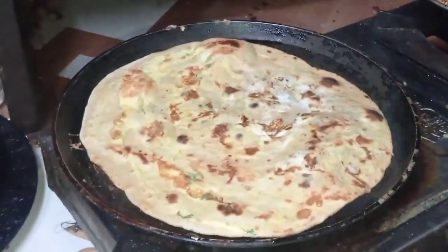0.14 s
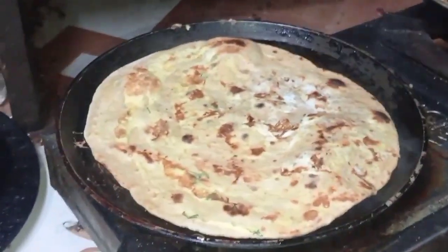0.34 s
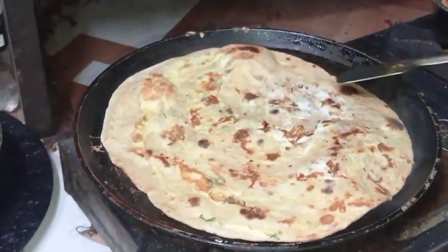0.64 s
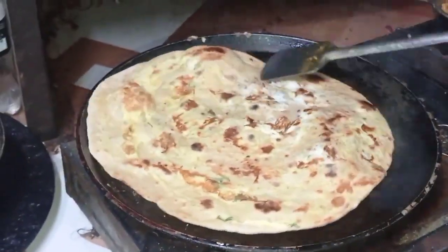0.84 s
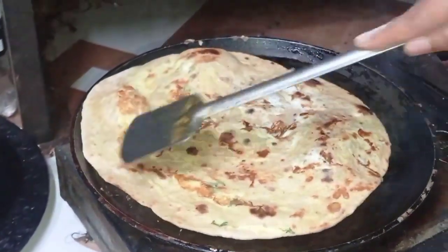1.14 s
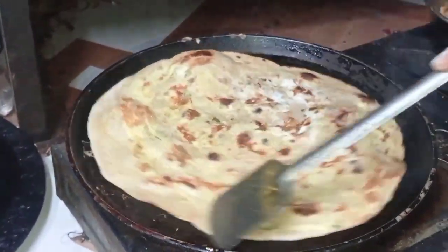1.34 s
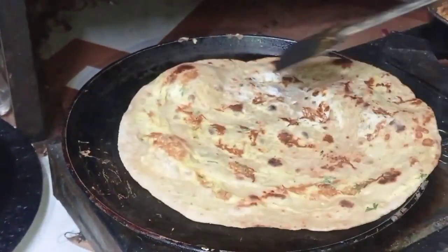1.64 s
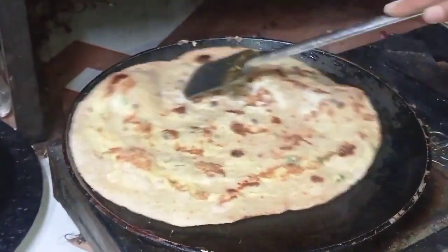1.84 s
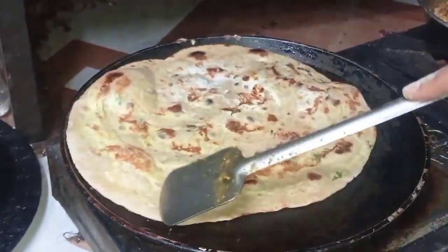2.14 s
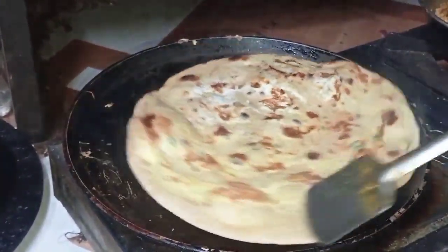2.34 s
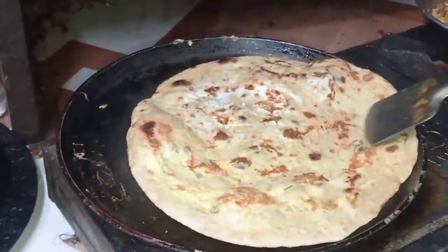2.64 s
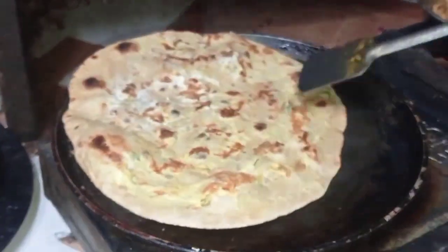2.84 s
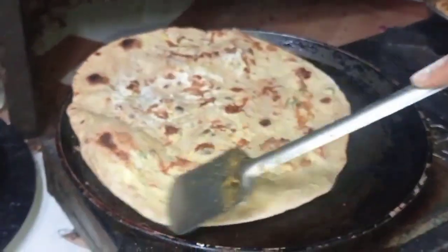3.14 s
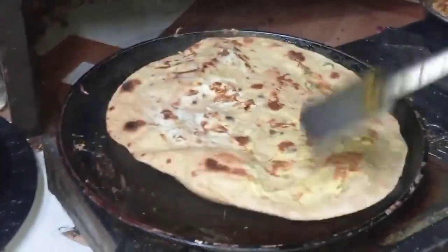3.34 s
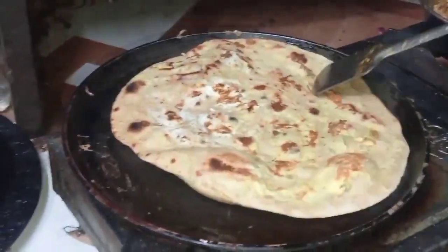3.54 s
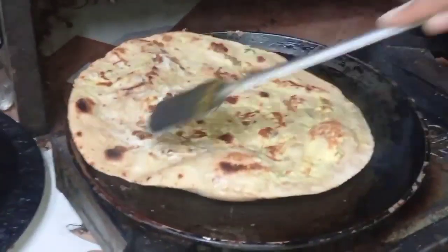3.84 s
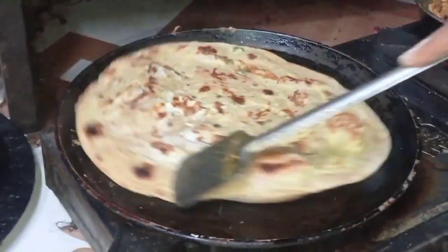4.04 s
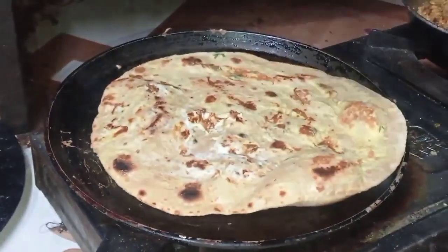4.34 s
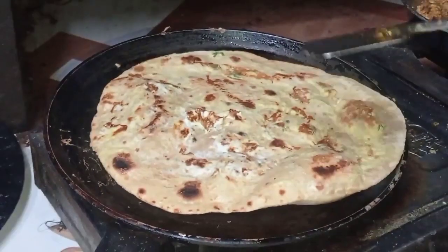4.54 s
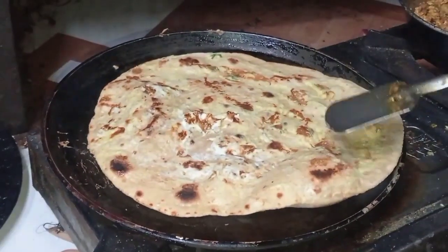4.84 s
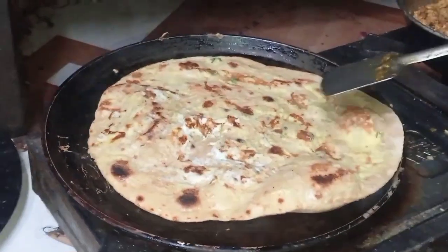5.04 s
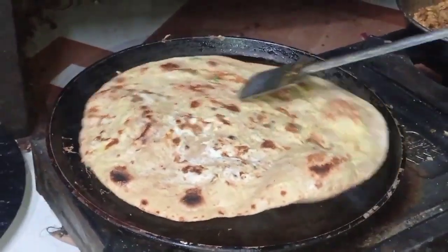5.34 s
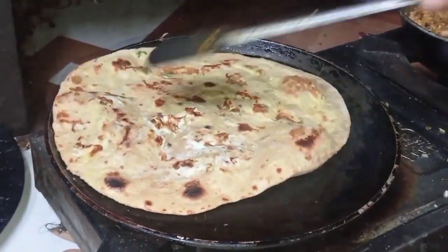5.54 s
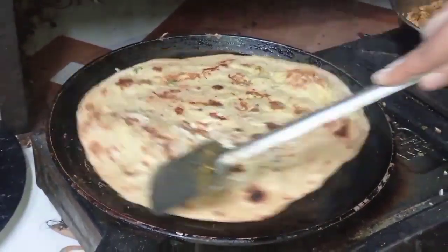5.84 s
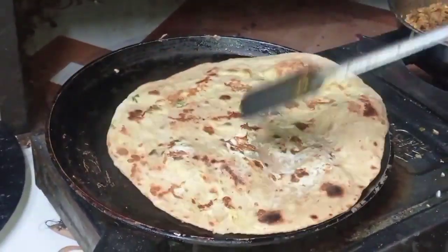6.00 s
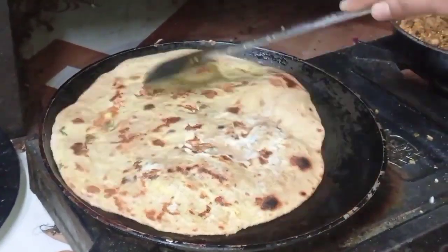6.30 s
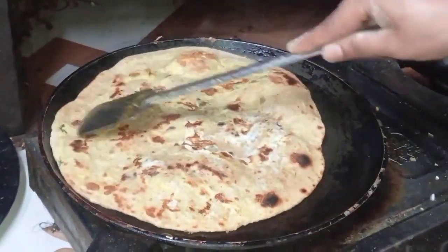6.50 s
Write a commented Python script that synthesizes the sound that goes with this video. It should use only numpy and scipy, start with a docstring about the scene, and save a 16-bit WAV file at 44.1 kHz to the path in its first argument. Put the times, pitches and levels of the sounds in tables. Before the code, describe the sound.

A metal spatula knocks, scrapes and sweeps a flatbread around a hot iron griddle, over fine oil sizzle and faint steam whistles in a small kitchen.

```python
"""A steel spatula turns a flatbread on a hot iron griddle, over a fluttering flame and sizzling oil in a small kitchen.
First the blade knocks and drags as steam whistles; bread thumps, then sweeps rasp and knocks crowd from 0.5 to 1.7 s.
Sweeps go on under a wandering steam leak; a crust blister pops at 3.4 s, and the hardest knock follows at 3.75 s.
A second leak starts at 4.2 s; more sweeps lead to the last hard knocks near 6.4 s.
Noise excites resonant modes for iron, clicks make grit and bubbles, shaken sines whistle, and delays form the room."""
import sys
import numpy as np
from scipy import signal
from scipy.fft import rfft, irfft
from scipy.io import wavfile

SR = 44100
rng = np.random.default_rng(int(sys.argv[2]) if len(sys.argv) > 2 else 0)


def bounce(signal):
    """Save signal as a 16-bit WAV file at the path given by the first command-line argument."""
    frames = np.transpose(np.atleast_2d(signal))
    limited = np.clip(frames, -1, 1)
    pcm = np.round(limited * 32767).astype(np.int16)
    wavfile.write(sys.argv[1], SR, pcm)


def makeup_ratio(level_db):
    """Linear amplitude ratio for a level in decibels (20 dB per factor of ten)."""
    decades = np.asarray(level_db, float) / 20
    return 10 ** decades


N = 293916
TIME = np.arange(N) / SR   # [s]


def rms_one(x):
    """Normalisation: scale to rms 1."""
    return x / np.sqrt(np.mean(x ** 2) + 1e-20)


def in_time(rows):
    """Linear interpolation: columns of a table, read at every sample."""
    s, *columns = np.transpose(rows)
    return [np.interp(TIME, s, c) for c in columns]


def drift(rate):
    """Low-passed noise: slow chance of spread 1, changing about rate times a second."""
    r = np.exp(-80 * np.pi * rate / SR)   # one step is 40 samples
    noise = rng.standard_normal(N // 40 + 2002)
    slow = rms_one(signal.lfilter([1], [1, -2 * r, r * r], noise)[2000:])
    return np.interp(np.arange(N) / 40, np.arange(len(slow)), slow)


def band(x, low_hz, high_hz):
    """Band limiting: second-order Butterworth band-pass."""
    edges = np.clip([low_hz, high_hz], 10, .45 * SR)
    return signal.sosfilt(signal.butter(2, edges, "band", fs=SR, output="sos"), x)


def coloured(x, spectrum):
    """Spectral shaping: weight x by levels interpolated over log frequency, to rms 1."""
    log_hz = np.log(np.maximum(np.fft.rfftfreq(N, 1 / SR), 1))
    points = np.array(spectrum)
    gain = makeup_ratio(np.interp(log_hz, np.log(points[:, 0]), points[:, 1]))
    return rms_one(irfft(rfft(x) * gain, N))


LONGEST_RING_S = .05   # the bread damps the iron


def ring(x, hz, t60):
    """Damped resonance: a unit click sets a sine of height about 1 ringing."""
    r = makeup_ratio(-60 / (np.clip(t60, .002, LONGEST_RING_S) * SR))
    w = 2 * np.pi * hz / SR
    return signal.lfilter([0, np.sin(w)], [1, -2 * r * np.cos(w), r * r], x + 1e-18)


def grains(per_s, spread_db):
    """Shot noise: random clicks of uneven size."""
    sizes = makeup_ratio(spread_db * np.minimum(rng.exponential(1, N), 5)) * rng.standard_normal(N)
    return sizes * (rng.random(N) < per_s / SR)


def breathy(hz, haze_share):
    """Turbulent modulation: a tone of rms about 1, shaken in pitch and strength."""
    breath_share, shakes_per_s = .25, 170
    phase = 2 * np.pi * np.cumsum(hz * (1 + haze_share * drift(shakes_per_s))) / SR
    strength = rms_one(1 - breath_share + breath_share * drift(26))
    return strength * np.sin(phase) * np.sqrt(2)


KITCHEN_T60_S, KITCHEN_DB, WALL_CUT_HZ = 0.21, -13.5, 7000   # T60 at low frequency


def kitchen(x):
    """Reverberation: eight feedback delays, duller on every round."""
    out, dull = np.zeros(N), np.exp(-2 * np.pi * WALL_CUT_HZ / SR)
    lags = (rng.uniform(0.0094, .03, 8) * SR).astype(int)
    for k, lag in enumerate(lags):
        loop, state = x.copy(), [0.]
        gain = makeup_ratio(-60 * lag / SR / KITCHEN_T60_S)
        for i in range(lag, N, lag):   # one delay length at a time
            back, state = signal.lfilter([gain * (1 - dull)], [1, -dull], loop[i - lag:i], zi=state)
            loop[i:i + lag] += back[:N - i]
        out += (loop - x) * (-1) ** k
    return out


# spectrum of the low rumble: (frequency [Hz], relative level [dB per Hz])
RUMBLE_SPECTRUM = [(15, -52), (30, 4.5), (60, 22.5), (110, 16.5), (200, 12.5), (300, -31.5), (500, -21)]
RUMBLE_DB = -67.5   # mean
# mean strength of the flame's flutter: (time [s], level [dB])
FLUTTER = [(0.0, -43), (.1, -70), (.3, -56), (.45, -63.5), (1.1, -74), (1.43, -50), (1.66, -69), (1.8, -58),
           (2.5, -54.5), (2.9, -53.5), (3.15, -68), (3.25, -48), (3.45, -55.5), (3.7, -59), (4.45, -69.5),
           (4.6, -58), (5.1, -60), (5.45, -65), (5.63, -42.5), (5.85, -65.5), (6.05, -65.5), (6.66, -71.5)]
FLAME_HZ, FLAME_WIDTH_HZ = 138.7, 39
THROB_DB, THROBS_PER_S = 4.5, 12.6


def flame():
    """Modulated narrow-band noise: the flame throbs unevenly in the gap under the iron, over a rumble."""
    flutter_db, = in_time(FLUTTER)
    half = FLAME_WIDTH_HZ / 2
    flutter = rms_one(band(rng.standard_normal(N), FLAME_HZ - half, FLAME_HZ + half))
    rumble = coloured(rng.standard_normal(N), RUMBLE_SPECTRUM)
    throbbing = makeup_ratio(flutter_db + THROB_DB * drift(THROBS_PER_S)) * flutter
    return throbbing + makeup_ratio(RUMBLE_DB + 3.1 * drift(6.2)) * rumble


# frying: (time [s], sizzle level [dB], mean level of the hiss near 15 kHz [dB])
FRYING = [(0, -44.5, -65), (.4, -45.5, -67), (.75, -46.5, -65), (1.15, -46, -59), (1.5, -40.5, -50),
          (1.68, -46, -62), (2.02, -46, -62), (2.18, -45.5, -60), (2.6, -46.5, -64), (3.05, -45, -63),
          (3.5, -44.5, -54), (3.98, -46, -56), (4.35, -49, -66), (4.8, -49, -65.5), (5.2, -49.5, -70),
          (5.65, -47.5, -66), (6.15, -49, -70), (6.6, -48, -67)]
# gain of the sizzle below 2.45 kHz: (time [s], gain [dB])
LOW_SIZZLE = [(0, 2.5), (.7, 3), (1.15, 1.5), (1.7, 1.5), (2.1, -1), (2.6, 3.5), (3.1, -1), (3.55, 2.8),
              (4.3, 1), (5.0, 1.5), (5.65, 1), (6.6, 7.5)]
# spectrum of the sizzle before that gain: (frequency [Hz], relative level [dB per Hz])
SIZZLE_SPECTRUM = [(150, -22), (220, -8.5), (350, -12.5), (800, -14.5), (1300, -11), (1750, -11),
                   (2200, -9), (2450, -4), (2750, 0), (3300, 1.5), (4000, -1), (5500, 1.5), (7000, -1),
                   (9500, -10), (12500, -20.5), (14000, -43)]


def sizzle():
    """Shot noise: thousands of tiny bubbles burst in the oil; each half octave flickers on its own."""
    sizzle_db, hiss_db = in_time(FRYING)
    low_db, = in_time(LOW_SIZZLE)
    fizz = [grains(16000, spread_db=1.0) for _ in range(2)]
    edges = 150 * 2 ** np.arange(0, 7, .5)
    patchy = np.zeros(N)
    for k, (low, high) in enumerate(zip(edges, edges[1:])):
        flicker = makeup_ratio(0.095 * drift(5.5) + 1.8 * drift(20))
        patchy += flicker * band(fizz[k % 2], low, high)
    patchy = coloured(patchy, SIZZLE_SPECTRUM)
    low_part = signal.sosfiltfilt(signal.butter(8, 2450, fs=SR, output="sos"), patchy)
    patchy = patchy + (makeup_ratio(low_db) - 1) * low_part
    hiss = band(band(rng.standard_normal(N), 14300, 16500), 14000, 17000)
    return makeup_ratio(sizzle_db) * rms_one(patchy) + makeup_ratio(hiss_db + 1.8 * drift(32)) * rms_one(hiss)


# fat spitting in short bursts, and a brief bright tick near 4.27 s at 7.4 kHz: # (time of crest [s], level at
# crest [dB], frequency [Hz], time from crest to 1/e [s])
SPITS = [(0.71, -54, 12400, 0.0086), (.9, -49, 11300, 0.014), (3.578, -59, 15000, .03),
         (4.18, -62, 12000, 0.064), (4.27, -46.5, 7400, .005), (4.293, -70, 12520, 0.027),
         (5.14, -68, 13000, 0.047)]


def spits():
    """Gated band noise: narrow puffs of hiss under Gaussian envelopes."""
    noise, out = rng.standard_normal(N), np.zeros(N)
    for s, level_db, hz, length_s in SPITS:
        puff = rms_one(band(noise, hz * 0.92, hz * 1.06))
        out += makeup_ratio(level_db) * np.exp(-((TIME - s) / length_s) ** 2) * puff
    return out


# short whistles of steam out of the bread:
# (start [s], length [s], first frequency [Hz], last frequency [Hz], level [dB])
PUFFS = [(0.028, 0.89, 1236, 1294, -59), (0.064, 0.52, 2510, 2560, -52.5), (.01, 0.95, 3550, 3490, -57.5),
         (0.673, 0.045, 1905, 1885, -52), (.955, 0.12, 1147, 1133, -55.5), (.995, 0.1, 805, 780, -58),
         (0.977, 0.13, 1890, 1940, -52.5), (1.055, 0.19, 1247, 1286, -59.5),
         (1.712, 0.34, 1517, 1465, -54.5), (2.887, 0.25, 7850, 8090, -66), (4.525, 0.07, 1165, 1120, -52.5),
         (4.634, 0.08, 1110, 1060, -59.5), (5.537, 0.094, 705, 690, -63.5), (5.646, 0.15, 920, 916, -58.5),
         (6.106, 0.155, 1840, 1850, -51.5), (6.443, 0.24, 2830, 2830, -54)]
# two long leaks of steam near 3 kHz, each a list of (time [s], frequency [Hz], level [dB])
LEAKS = [
    [(1.95, 3330, -60), (2.4, 3380, -54), (2.55, 3390, -54), (2.62, 3340, -53), (2.75, 3420, -48),
     (2.87, 3170, -52), (2.98, 3210, -46.5), (3.05, 3340, -48.5), (3.17, 3300, -52), (3.26, 3230, -56),
     (3.45, 3400, -57), (3.55, 3380, -59.5)],
    [(4.22, 3080, -62), (4.45, 3130, -58), (4.65, 3080, -58.5), (4.8, 2970, -54.5), (5.05, 3020, -61.5),
     (5.3, 2990, -58), (5.45, 2980, -67)],
]
# share of the length spent swelling and as much fading; pitch shake as share of pitch
WHISTLE_SWELL, PUFF_HAZE_SHARE, LEAK_HAZE_SHARE = .2, .04, .022


def whistles():
    """Turbulent jet tones: short whistles swell, glide and fade; long leaks wander in pitch and level."""
    out = np.zeros(N)
    for s, length_s, first_hz, last_hz, level_db in PUFFS:
        along = np.clip((TIME - s) / length_s, 0, 1)
        swell = np.clip(np.minimum(along, 1 - along) / WHISTLE_SWELL, 0, 1)
        hz = first_hz + (last_hz - first_hz) * along
        out += swell * makeup_ratio(level_db) * breathy(hz, PUFF_HAZE_SHARE)
    for rows in LEAKS:
        hz, level_db = in_time(rows)
        from_end_s = np.minimum(TIME - rows[0][0], rows[-1][0] - TIME)
        out += np.clip(from_end_s / 0.036, 0, 1) * makeup_ratio(level_db) * breathy(hz, LEAK_HAZE_SHARE)
    return out


POP_S, POP_DB, POP_HZ = 3.4206, -18.5, 560


def pop():
    """Pressure release: a crust blister bursts with a suck, a push cracking near its crest, a rebound."""
    t = np.maximum(TIME - POP_S, 0)
    push = -np.sin(2 * np.pi * POP_HZ * t) * (t < 1 / POP_HZ)   # one cycle
    after = np.maximum(t - .0026, 0)
    rebound = -.4 * np.cos(2 * np.pi * 95 * after) * np.exp(-after / 0.0058)
    rebound = rebound * np.clip(after / 0.0006, 0, 1)
    burst = rng.standard_normal(N) * np.exp(-((t - .0015) / .0006) ** 2)
    crack = 1.8 * band(burst, 700, 1900)
    return makeup_ratio(POP_DB) * (push + rebound + crack)


# dull thumps of the soft bread: (time [s], relative level [dB], frequency [Hz])
THUMPS = [(0.147, -27, 447), (0.168, -21, 381), (0.18, -21, 381), (0.204, -27, 330), (0.217, -23, 490),
          (0.24, -25.5, 400), (0.53, -22.5, 417), (1.292, -22, 563), (1.324, -12.5, 584), (2.429, -21, 375),
          (4.352, -25.5, 406), (4.488, -18.5, 483), (4.509, -25, 255)]


def thumps():
    """Heavy damping: soft dough on iron gives a few dull cycles."""
    out = np.zeros(N)
    for s, level_db, hz in THUMPS:
        t = np.maximum(TIME - s, 0)
        envelope = (t / 0.0068) * np.exp(-t / 0.0032)
        out += makeup_ratio(level_db + 4) * envelope * np.sin(2 * np.pi * hz * t)
    return out


# modes of the iron, also struck by the knocks:
# (frequency [Hz], relative level [dB], t60 before the bread's damping limit [s])
GRIDDLE_MODES = [(387, -18.5, 0.0225), (494, -75, 0.039), (571, -0.5, 0.0083), (650, 3.5, 0.0417),
                 (731, 4.5, 0.011), (847.7, 5.5, 0.12), (912, -1, 0.019), (968, 2.5, 0.11),
                 (1140, -36, 0.036), (1173.5, 7.5, 0.02), (1386, 7, 0.054), (1423, -0.5, 0.0097),
                 (1630, 9.5, 0.072), (1701, 0.5, 0.052), (1850, 4, 0.11), (2100, 4.5, 0.045),
                 (2118, 11, 0.062), (2413, -59, 0.09), (2540, -29, 0.11), (2925, 17, 0.068),
                 (3100, 11.5, 0.065), (3250, 31.5, 0.0098), (3400, -2, 0.026), (3566, 27, 0.045),
                 (3820, -26.5, 0.028)]
# spectrum of the scraped grit: (frequency [Hz], relative level [dB per Hz])
RASP_SPECTRUM = [(180, -13), (300, -18), (632, 5), (771, -3), (925, 13), (1620, 14), (2810, 15),
                 (5440, 12.5), (6860, 11), (13500, -14.5), (15700, -1)]
# the bread is swept across the iron:
# (start [s], swell [s], hold [s], fade [s], relative level [dB])
SWEEPS = [(0.535, 0.032, .0, .06, -50), (.665, 0.034, 0.018, .06, -52), (0.788, 0.039, 0.013, 0.041, -42.5),
          (1.739, .11, 0.095, 0.18, -40), (2.046, .05, 0.017, 0.06, -52), (2.233, 0.052, 0.12, 0.06, -40.5),
          (2.709, 0.056, .07, 0.15, -36.5), (3.172, 0.072, 0.1, 0.14, -40),
          (3.599, 0.042, 0.0097, 0.032, -43.5), (3.964, .04, 0, 0.18, -41), (4.008, .1, 0.064, 0.15, -40),
          (5.325, 0.089, 0.054, 0.21, -40), (5.784, 0.059, .16, 0.19, -39.5),
          (6.033, 0.034, 0.18, 0.064, -50.5), (6.199, 0.064, .0, 0.046, -39),
          (6.6, 0.064, 0.17, 0.033, -43.5)]
# the blade drags on the iron, mostly just after a knock: (start [s], relative level [dB], hold [s],
# humming region [Hz], treble share at the start [dB], depth share [dB])
DRAGS = [(0.0, -31.5, 0.0028, 730, -12, -17), (0.055, -27.5, .008, 750, -8.5, -8),
         (.856, -32.5, 0.017, 910, -8, -4), (1.258, -36.5, .01, 1490, -6, -15),
         (1.3, -44, 0.023, 630, 3, 5), (1.31, -37.5, 0.055, 630, -5, -4),
         (1.387, -33.5, 0.14, 790, -2.5, 0.5), (2.413, -32, .006, 860, -16, -6.5),
         (3.66, -31.5, 0.023, 1070, -10, -1.5), (3.696, -48.5, 0.049, 1020, 10.5, -21),
         (3.751, -26, 0.079, 1110, -9.5, -4), (4.001, -63, 0.0059, 1510, -3, 10),
         (4.481, -43, .006, 593, -6.5, 0.5), (5.278, -52, 0.0036, 1520, 5.5, -14),
         (6.271, -28.5, 0.01, 1080, -19, -4), (6.312, -43, 0.07, 1000, 7.5, -13),
         (6.357, -31.5, 0.086, 1120, -34, -2.5), (1.524, -46, 0.012, 920, 4, -10),
         (0.136, -70, 0.07, 595, 7, 9), (4.538, -58, .15, 1140, -9, -11)]
CATCH_DB = 9   # coarse crumbs among the grit
SWEEP_EDGE_DB = 39.5   # level lost over the swell and over the fade
SWEEP_HZ, LIGHTER_DB_PER_OCTAVE = 1300, 22   # a -41 dB sweep hums at SWEEP_HZ; lighter ones hum higher
SWEEP_FALL_DB, SWEEP_TREBLE_DB, SWEEP_DEPTH_DB = 9.5, -1, -34   # fall per octave; shares
DRAG_ATTACK_S, DRAG_FADE_DB_PER_S, DRAG_FALL_DB = 0.003, 278.5, 11   # the last per octave
TREBLE_FADE_DB_PER_S = 91   # extra: the treble fades from the start of each drag
DRAG_JUDDER_DB, JUDDERS_PER_S = 0.5, 29   # the pressed blade sticks and slips


def slides():
    """Friction excitation: grit catches rasp and set modes near the rubbed region humming."""
    grit = grains(9000, spread_db=0.5) + makeup_ratio(CATCH_DB) * grains(150, spread_db=3.0)
    grit = grit * makeup_ratio(0.72 * drift(41))
    modes = np.array([mode for mode in GRIDDLE_MODES if mode[0] < 2900])
    voices = []
    for hz, _, t60 in modes:
        hum = rms_one(ring(grit, hz, t60))
        scrape = rms_one(band(grit, hz / 1.0585, hz * 1.089))
        voices.append(makeup_ratio(-1.5) * hum + scrape)
    voices = band(np.array(voices), 606, 3140)
    rasp = coloured(grit, RASP_SPECTRUM)
    deep = rms_one(band(band(rasp, 270, 560), 250, 700))
    treble = rms_one(band(rasp, 1700, 16000))

    def colour(region_hz, fall_db, treble_db, depth_db):
        """Modal weighting: the rasp as it sounds from one region of the plate."""
        gains = makeup_ratio(modes[:, 1] - fall_db * abs(np.log2(modes[:, 0] / region_hz)))
        hum = gains @ voices / np.linalg.norm(gains)
        return hum + makeup_ratio(treble_db) * treble + makeup_ratio(depth_db) * deep

    out = np.zeros(N)
    for s, swell_s, hold_s, fade_s, level_db in SWEEPS:
        before = 1 - (TIME - s) / swell_s
        after = (TIME - s - swell_s - hold_s) / fade_s
        away = np.maximum(np.maximum(before, after), 0)
        region_hz = SWEEP_HZ * 2 ** (-(level_db + 41) / LIGHTER_DB_PER_OCTAVE)   # harder reaches deeper
        sound = colour(region_hz, SWEEP_FALL_DB, SWEEP_TREBLE_DB, SWEEP_DEPTH_DB)
        out += makeup_ratio(level_db - SWEEP_EDGE_DB * away) * sound
    judder = makeup_ratio(DRAG_JUDDER_DB * drift(JUDDERS_PER_S))
    for s, level_db, hold_s, region_hz, treble_db, depth_db in DRAGS:
        fade_db = DRAG_FADE_DB_PER_S * np.maximum(TIME - s - hold_s, 0)
        press = np.clip((TIME - s) / DRAG_ATTACK_S, 0, 1) * makeup_ratio(level_db - fade_db)
        falling_db = treble_db - TREBLE_FADE_DB_PER_S * np.maximum(TIME - s, 0)
        out += press * judder * colour(region_hz, DRAG_FALL_DB, falling_db, depth_db)
    return out


# knocks on the griddle: (time [s], relative level [dB], struck region [Hz], relative crack level [dB],
# fall away from the region [dB per octave], below zero taken as zero)
KNOCKS = [(0.057, -25, 905, -28, 3), (0.063, -14.5, 820, -31, 48), (0.557, -32, 2280, -21, 43),
          (0.683, -35, 3440, -15, 14), (0.854, -17.5, 850, -15, 14), (0.934, -26.5, 1680, -9, 28),
          (1.263, -24, 1600, -1, 16), (1.315, -20.5, 980, -21, 4), (1.391, -16.5, 3100, 1, -4),
          (1.494, -17.5, 988, -19, 21), (1.523, -23, 1100, -8, 17), (1.635, -37, 2860, 1, 16),
          (2.059, -31, 2140, -24, 21), (2.409, -24.5, 925, -25, 17), (3.665, -16.5, 1200, -48, 27),
          (3.752, 0.5, 920, -9.5, 8), (3.798, -15.5, 1980, -33, 23), (3.824, -15.5, 1170, -41.5, 20),
          (3.852, -27, 824, -12, 15), (3.903, -27, 1380, -20.5, 31), (4.007, -32, 1440, 8, 25),
          (4.484, -29, 3300, -31, 15), (5.279, -45, 3140, -11, 8), (6.268, -15, 860, -38, 13),
          (6.357, -3.5, 850, -8, 11), (6.393, -18, 743, -38, 11), (6.423, -22.5, 1600, -22, 12)]
RATTLE_S, RATTLE_DOUBLES_DB = .0058, 24   # decay for a listed -20 dB; harder knocks rattle longer


def knocks():
    """Modal excitation: a rattling contact strikes every mode anew, with a dry thud and a crack."""
    out, t = np.zeros(N + SR), np.arange(SR // 5) / SR
    contacts = rng.standard_normal((len(KNOCKS), 2, len(t)))
    strengths = rng.normal(0, 0.77, (len(KNOCKS), len(GRIDDLE_MODES)))   # [dB]
    for (s, knock_db, region_hz, crack_db, fall_db), noise, chance_db in zip(KNOCKS, contacts, strengths):
        rattle_s = RATTLE_S * 2 ** ((knock_db + 20) / RATTLE_DOUBLES_DB)
        # hard contacts start abruptly, soft ones build up
        snap = makeup_ratio(crack_db + 11) * np.exp(-t / 0.0013)
        rattle = np.exp(-t / rattle_s) * (1 - np.exp(-t / 0.00069))
        contact = noise[0] * (snap + rattle)
        body = np.zeros(len(t))
        for (hz, level_db, t60), c in zip(GRIDDLE_MODES, chance_db):
            off_db = max(fall_db, 0) * abs(np.log2(hz / region_hz))
            body += makeup_ratio(level_db + c - off_db) * ring(contact, hz, t60)
        thud = band(contact, region_hz / 2.26, region_hz * 1.7)
        crack_envelope = np.exp(-t / 0.00063) + .35 * np.exp(-t / .007)
        crack = band(noise[1] * crack_envelope, 2400, 8000)
        blow = body / np.std(body[:600])
        blow += makeup_ratio(-1.5) * thud / np.std(thud[:600])
        blow += makeup_ratio(crack_db + 7.5) * crack / np.std(crack[:300])
        at = round(s * SR)
        out[at:at + len(t)] += makeup_ratio(knock_db - 15) * blow
    return band(band(out[:N], 535, 8000), 160, 15000)   # the plate is too small to radiate bass


def scene():
    """Superposition: contacts echo in the kitchen; the steady sounds lie under them."""
    steady = flame() + sizzle() + spits() + whistles()
    blows = thumps() + knocks()
    echo = makeup_ratio(KITCHEN_DB) * kitchen(blows)
    return (steady + pop() + slides() + blows + echo)[None]


def top_cut(x):
    """Nothing passes above about 16.9 kHz."""
    return signal.sosfilt(signal.butter(12, 16870, fs=SR, output="sos"), x)


PEAK_TOP, CUTOFF_HZ = .8, 15780


def record(dry):
    """Saturation and band limiting: peaks are rounded, the top is cut steeply."""
    rounded = PEAK_TOP * np.tanh(dry / PEAK_TOP)
    low_pass = signal.ellip(10, .5, 45, CUTOFF_HZ, fs=SR, output="sos")
    finished = signal.sosfilt(low_pass, rounded)
    return top_cut(finished)


dry = scene()
out = record(dry)
bounce(out)
```